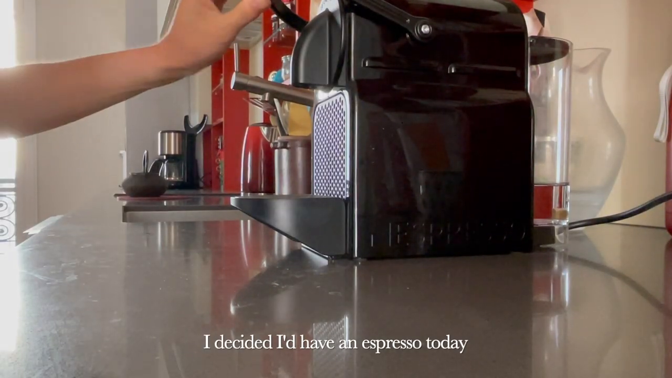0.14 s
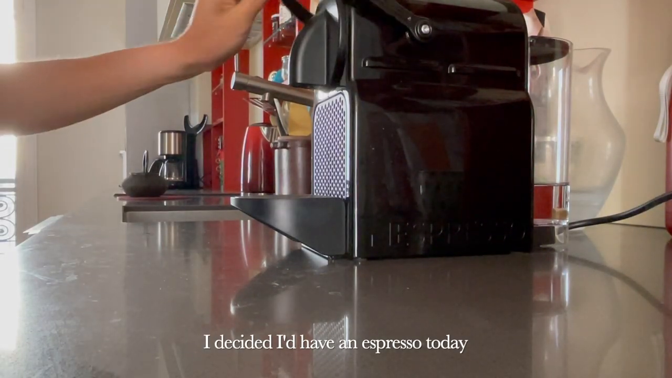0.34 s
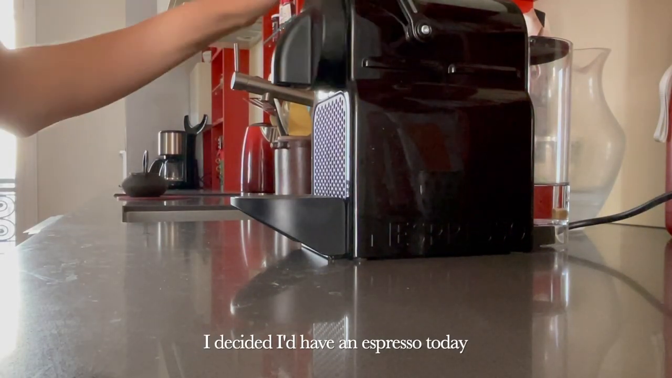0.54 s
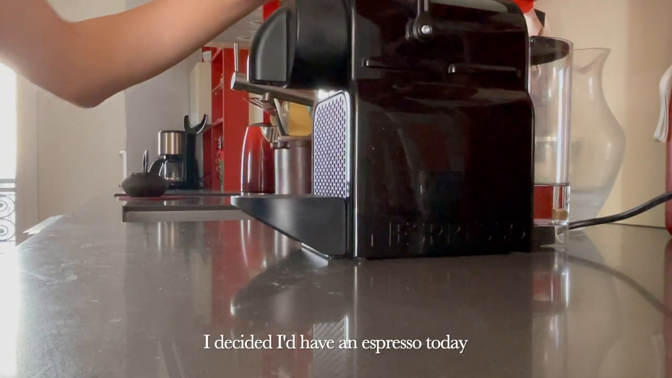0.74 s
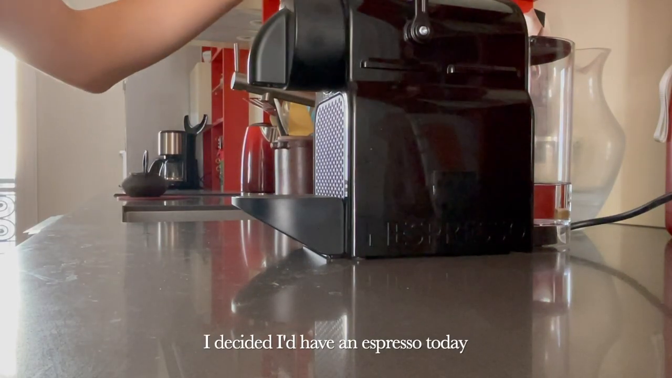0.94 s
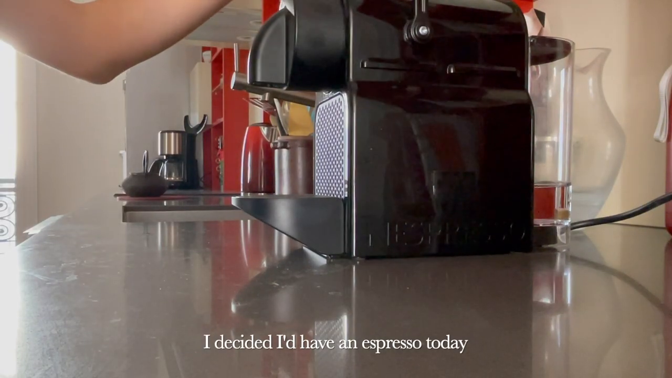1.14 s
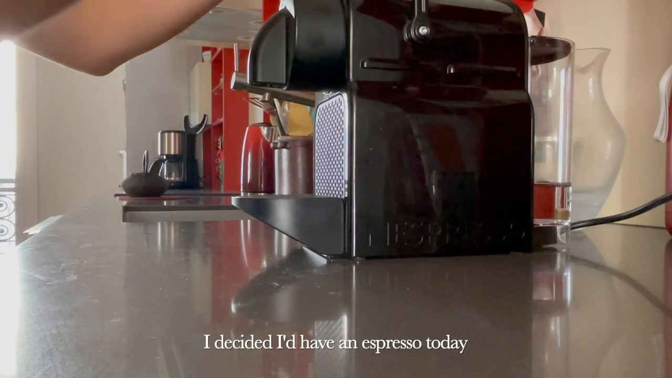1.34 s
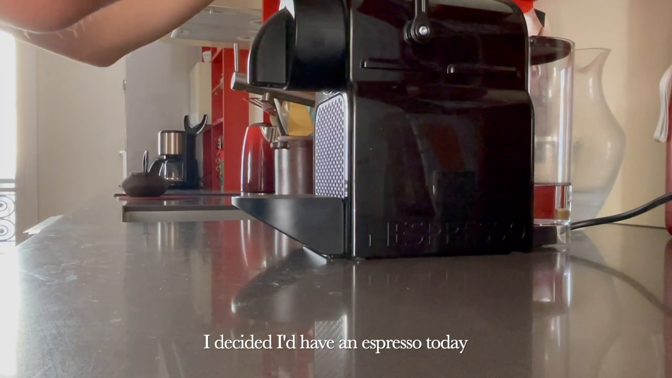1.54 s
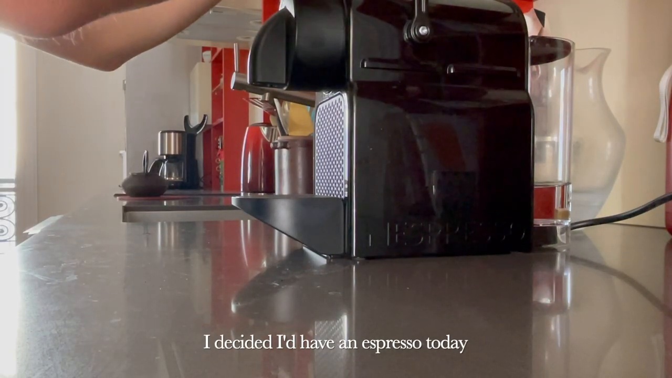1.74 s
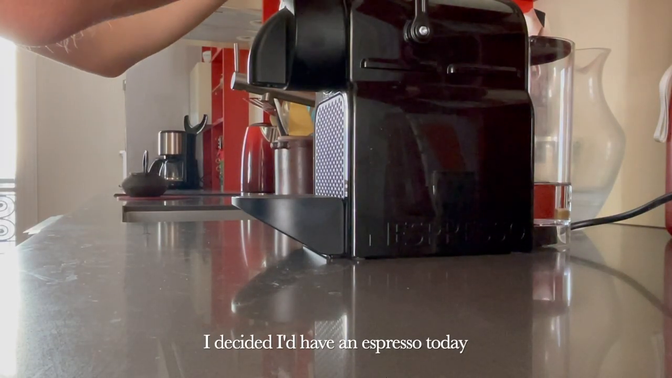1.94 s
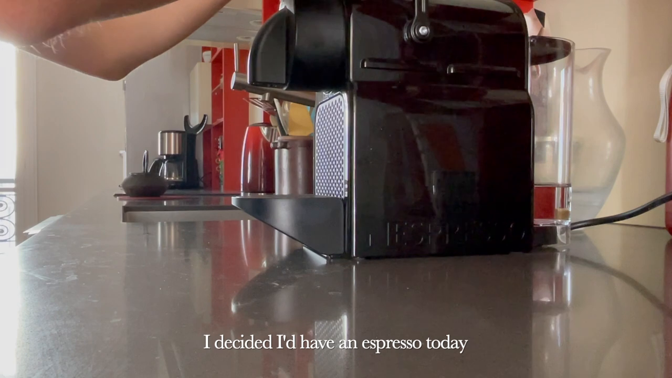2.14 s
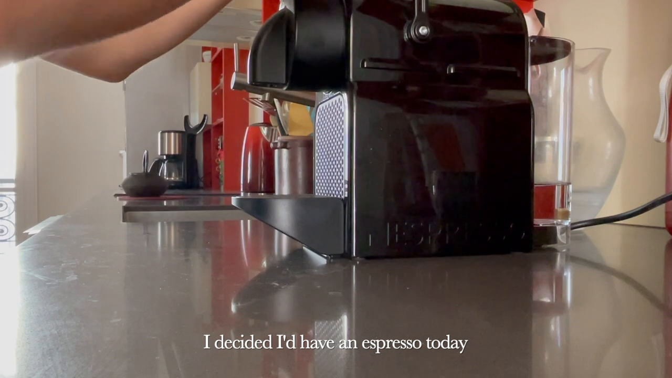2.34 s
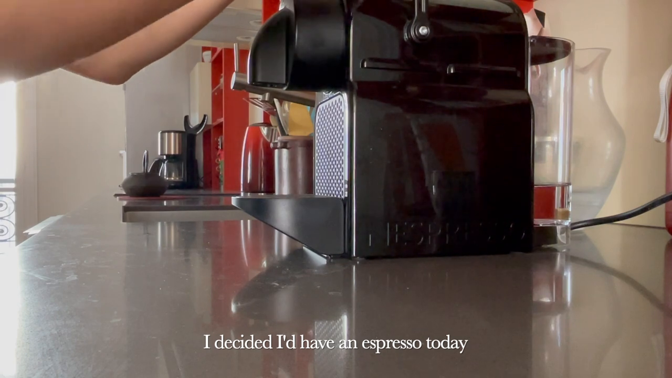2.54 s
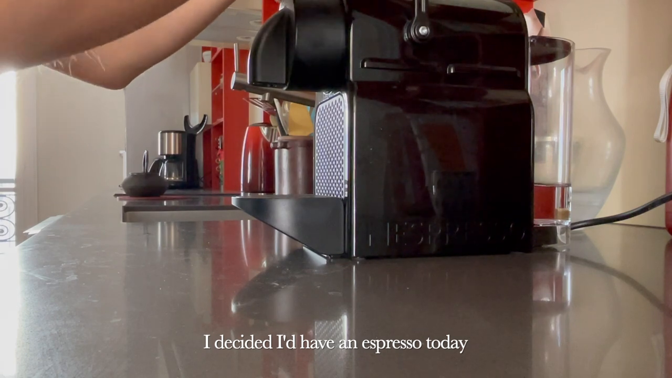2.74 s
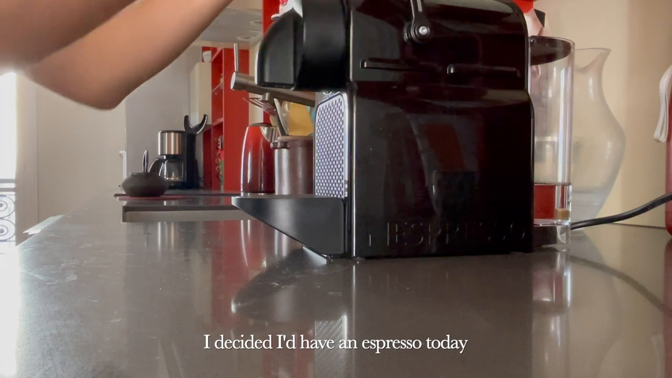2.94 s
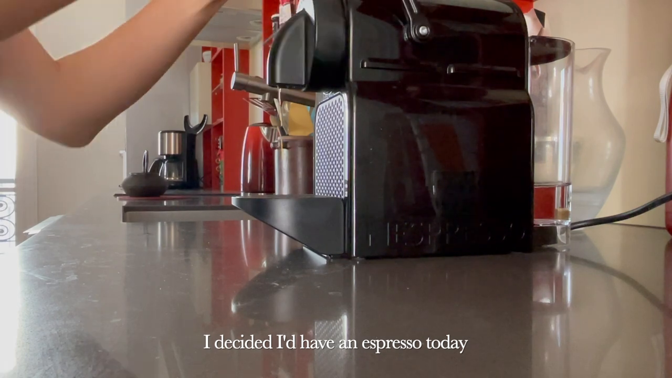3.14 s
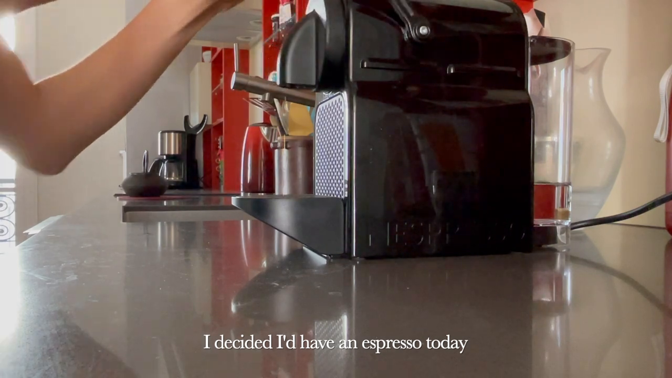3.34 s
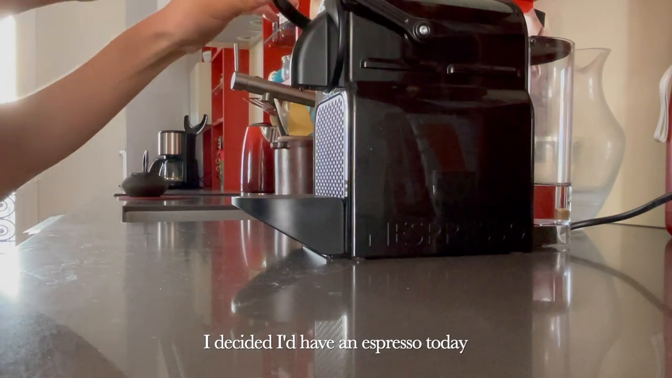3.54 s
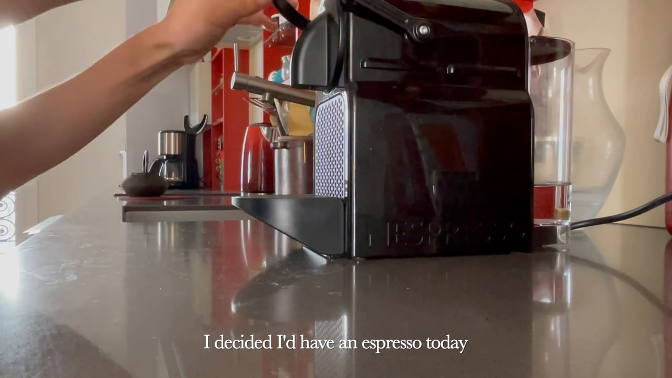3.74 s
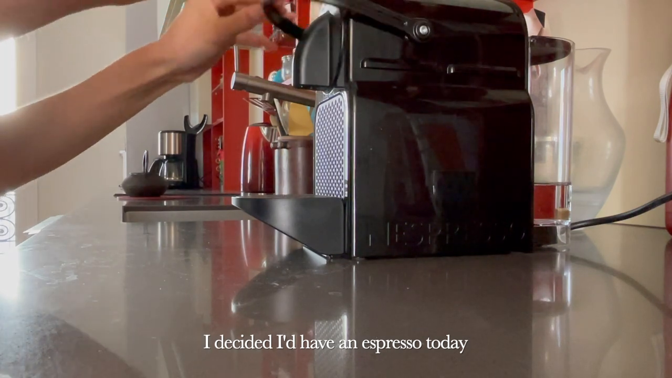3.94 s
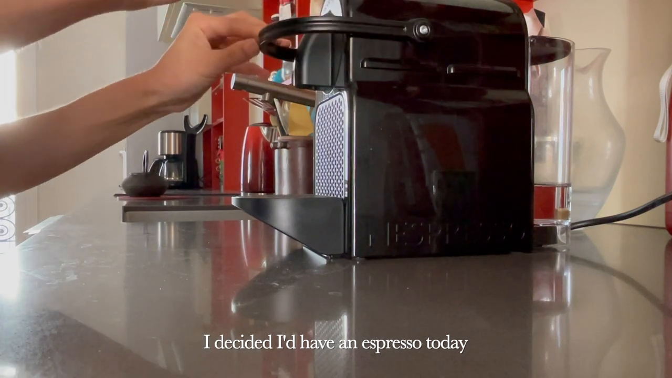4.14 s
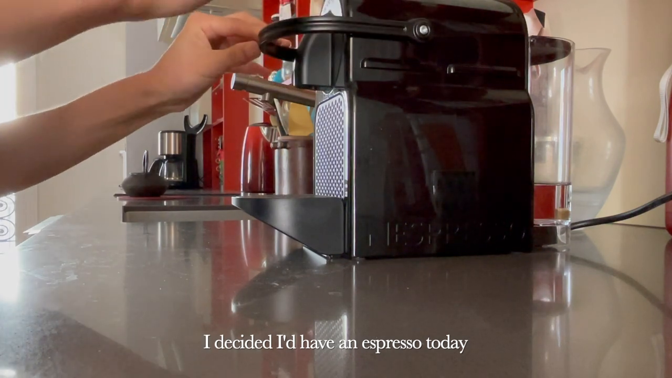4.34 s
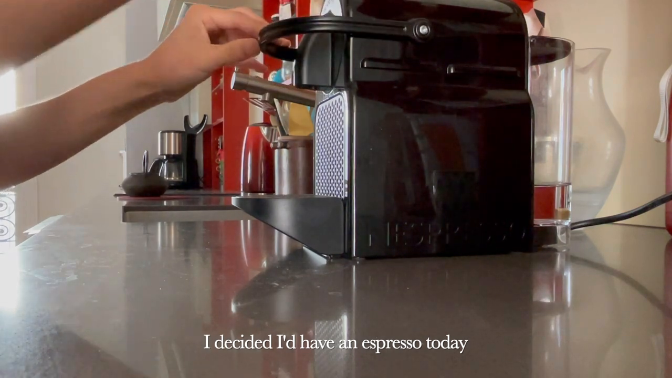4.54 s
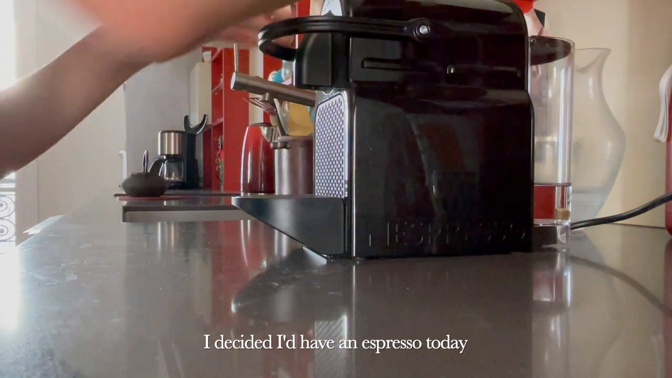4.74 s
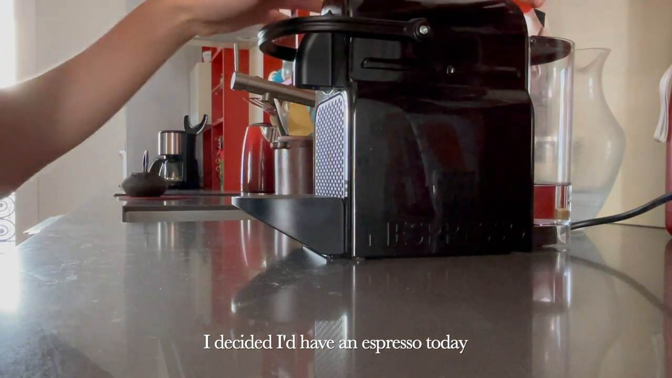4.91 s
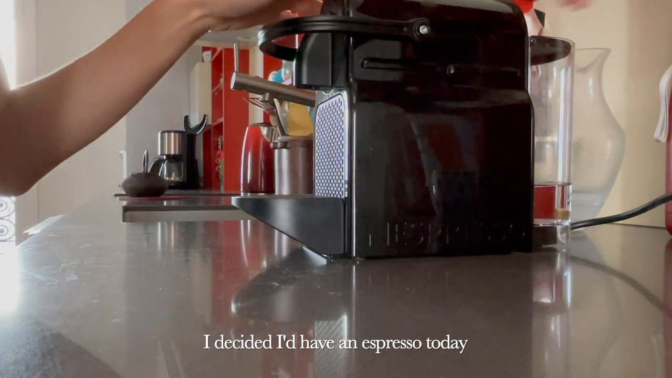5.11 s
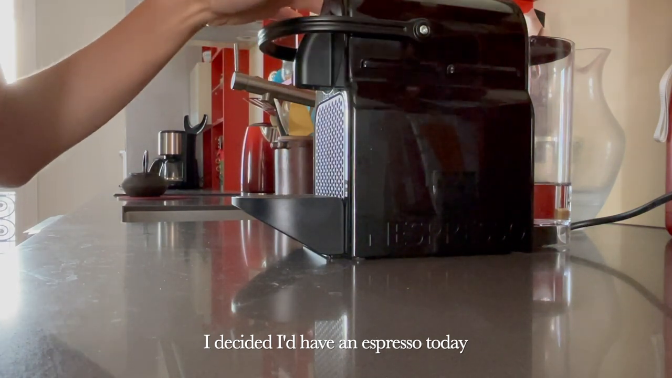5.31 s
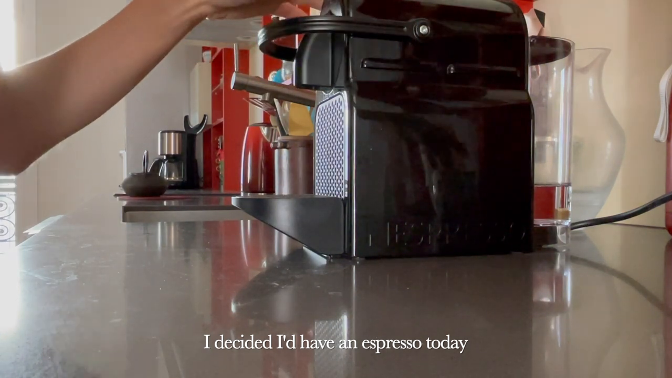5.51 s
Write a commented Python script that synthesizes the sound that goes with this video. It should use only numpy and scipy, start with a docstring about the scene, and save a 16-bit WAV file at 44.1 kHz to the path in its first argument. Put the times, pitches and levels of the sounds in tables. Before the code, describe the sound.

Hard plastic clicks, short scrapes and a heavy locking thud from a capsule coffee machine worked by hand in a quiet kitchen.

```python
"""A lever slides open and clunks, a capsule rattles in, the lever comes down and locks with a deep thud,
then a hand brushes the top and gives one last click: a capsule coffee machine on a stone kitchen counter.
Each contact mixes short noise bursts, a ringing plastic housing and a low thump that sets the counter humming.
Sliding is coloured noise with tiny slips in it, and the pivot's squeak is an uneven gliding tone.
Noise tails make the brief echo of the hard kitchen, over quiet room air and distant rumble."""
import sys
import numpy as np
from scipy import signal
from scipy.fft import rfft, irfft, next_fast_len
from scipy.io import wavfile
from scipy.ndimage import uniform_filter1d, map_coordinates

SR = 44100
rng = np.random.default_rng(int(sys.argv[2]) if len(sys.argv) > 2 else 0)


def digitize_waveform(pressure):
    """Quantize a signal to 16-bit integers and store it at the path in sys.argv[1].

    Rows of a 2-D input are taken as channels; values are limited to [-1, 1].
    """
    field = np.atleast_2d(pressure).T
    bounded = np.clip(field, -1, 1)
    quanta = np.round(bounded * 32767).astype(np.int16)
    wavfile.write(sys.argv[1], SR, quanta)


N = 245637
TIME = np.arange(N) / SR  # seconds, whole scene
RING = np.arange(SR // 2) / SR  # seconds, one blow

# Resonances of the plastic housing: f/Hz, relative level/dB, time to fade by 60 dB/s
SHELL_MODES = [(305, -18, .08), (365, -10, .115), (420, -10, .09), (500, -5, .09), (562, -4, .08),
               (675, -5, .08), (745, -5, .11), (830, -7, .08), (915, -5, .08), (1010, -7, .09),
               (1148, -3, .11), (1405, -9, .09), (1490, -9, .1), (1692, -11, .1), (1790, -12, .1),
               (1900, -8, .09), (2086, -11, .09), (2245, -7, .1)]
# How different left and right are: f/Hz, level of the difference against the common part/dB
STEREO_WIDTH = [(60, -13.5), (130, -10.5), (260, -10), (500, -9), (1000, -5.5), (2000, -3.5), (5000, 10),
                (8000, -12.5), (14000, 19)]


def amp(db):
    """Decibels to gain."""
    return 10 ** (np.asarray(db) / 20)


def unit(x):
    """Scale to an rms (average strength) of 1."""
    return x / np.sqrt(np.mean(x ** 2) + 1e-20)


def along(points, hz):
    """Read a table of (f/Hz, value) at any frequency, on a log axis."""
    f, v = np.transpose(points)
    return np.interp(np.log(hz + 1), np.log(f), v)


def filtered(x, response):
    """Multiply the spectrum of x by a response that depends on frequency."""
    n = x.shape[-1]
    padded = next_fast_len(n + 8192)
    spectrum = rfft(x, padded) * response(np.fft.rfftfreq(padded, 1 / SR))
    return irfft(spectrum, padded)[..., :n]


def resonance(f, hz, width):
    """Response of one resonance: 1 at its pitch hz, falling away on both sides; width in Hz."""
    return 1j * f * width / (hz * hz - f * f + 1j * f * width)


def width_from_fade(t60):
    """A resonance that fades slowly is narrow: its width in Hz from its 60 dB fade in seconds."""
    return np.log(1000) / (np.pi * t60)


def spread(pair):
    """Turn two unrelated signals into left and right, as different at each frequency as the width table says."""
    def shares(hz):
        side = amp(along(STEREO_WIDTH, hz))
        return np.array([np.ones_like(side), side]) / np.hypot(1, side)
    mid, side = filtered(pair, shares)
    return np.array([mid + side, mid - side])


def coloured(pair, spectrum):
    """A stereo sound of rms 1 with the given spectrum."""
    return unit(spread(filtered(pair, lambda hz: amp(along(spectrum, hz)))))


def wobble(rate):
    """A smooth random curve with `rate` random points a second."""
    points = rng.standard_normal(int(N * rate / SR) + 4)
    return map_coordinates(points, [TIME * rate])


def struck(attack, t60):
    """The loudness curve of a blow: a quick rise, then an even fade (both in seconds)."""
    return (1 - np.exp(-RING / attack)) * amp(-60 * RING / t60)


def add(track, s, sound):
    """Mix a sound into the track at s seconds."""
    part = track[..., max(round(s * SR), 0):][..., :sound.shape[-1]]
    part += sound[..., :part.shape[-1]]


def contacts():
    """A contact snaps, clacks, rings the housing and thumps the body, which shakes the counter."""
    # Spectra of the dull clack and the bright snap: f/Hz, level per Hz/dB
    clack_colour = [(120, -17.5), (300, 10.5), (800, 4), (1200, 0.5), (1700, -5), (2200, -5), (2600, -8.5),
                    (4000, -14.5), (6500, -25), (9000, -35.5), (16000, -41.5)]
    snap_colour = [(1000, -21.5), (3000, -11), (6000, 3.5), (8500, -3.5), (11000, -2.5), (13500, -10.5),
                   (16000, -9.5)]
    plastic, clacks, thumps = np.zeros((2, N)), np.zeros((2, N)), np.zeros(N)
    for s, thump_hz, thump_db, knock_hz, knock_db, clack_db, snap_db in blows():
        snap = coloured(rng.standard_normal((2, len(RING))), snap_colour) * struck(.0004, .04)
        clack = coloured(rng.standard_normal((2, len(RING))), clack_colour) * struck(.0007, .064)
        knock = shell_ring(knock_hz, reach=0.062, scatter_db=4.5, detune=0.0073)
        thump = struck(0.0017, 0.067) * np.sin(2 * np.pi * thump_hz * RING)
        add(plastic, s, amp(snap_db - 3) * snap)
        add(clacks, s, amp(clack_db - 3) * clack)
        add(plastic, s + .001, amp(knock_db - 2.5) * knock)
        # The heavy body answers later than the thin plastic.
        add(thumps, s + 0.0023, amp(thump_db + 6.5) * thump)
    return plastic + housing(clacks, panel_db=-1, shell_db=-0.5) + thumps + counter(thumps)


def blows():
    """Share out each contact's strength: (s, thump Hz, thump dB, knock Hz, knock dB, clack dB, snap dB).

    These levels are relative; contacts() trims each kind of sound once more."""
    # Hard plastic edges click together: t/s, strength/dB, snap over the strength/dB, knock f/Hz
    clicks = [ (0.7139, -23.5, -12.5, 1405), (0.767, -30.5, -13.5, 748.5), (.822, -22, -16, 371),
              (.834, -23, -28.5, 1390), (.858, -28.5, -24.5, 420), (1.211, -74, 11.5, 750),
              (1.2594, -88, 30, 750), (1.639, -39, -45, 493), (1.680, -34, -31, 503),
              (1.801, -34.5, -15, 550), (1.838, -41, -21, 1080), (1.960, -52, 1.5, 1495),
              (1.9935, -36, -8, 1010), (2.026, -39, 0, 1156), (2.038, -30, -10, 1148),
              (2.653, -48, -42, 565), (3.074, -68, 4, 750), (3.1718, -63.5, 4, 670),
              (3.362, -33.5, -15.5, 733), (3.4102, -30.5, -6, 765), (3.773, -59, -12, 2250),
              (4.016, -30.5, -20, 1130), (4.027, -20.5, -16.5, 2090), (4.033, -20.5, -33.5, 675),
              (4.542, -58.5, -15, 720), (4.9485, -33, -18.5, 1060)]
    # Blunt knocks that mostly ring the housing: t/s, strength/dB, knock f/Hz
    knocks = [(.150, -33.5, 524), (.199, -43, 830), (0.359, -49.5, 407), (.844, -26, 683),
              (1.732, -43.5, 970), (1.876, -38.5, 1493), (2.041, -33.5, 985), (2.642, -41.5, 950),
              (2.925, -38, 1040), (3.762, -47.5, 666), (4.837, -36.5, 438)]
    # The mechanism seats and the whole machine takes the load:
    # t/s, strength/dB, thump f/Hz, knock f/Hz, knock over the strength/dB, rocking over the strength/dB
    thuds = [(0.162, -41.5, 135, 498, -9.5, -18.5), (0.7171, -18.5, 192, 363, 9, -28),
             (.823, -18, 150, 365, -6, 1.5), (1.641, -42, 160, 426, -2, -4.5),
             (2.052, -34.5, 175, 420, -11, -5), (2.651, -44, 172.6, 550, 1, 0),
             (2.816, -41, 192, 562, -12, -10.5), (3.298, -33, 179, 425, -16, -23),
             (3.411, -28, 140.1, 790, -12, -24.5), (3.43, -25, 200, 414, -2.5, -18.5),
             (3.436, -21.5, 68.6, 374.6, -21.5, -10), (4.0329, -9, 88.7, 745, -11, -10),
             (4.038, -19, 180.2, 365, -2.5, -20.5)]
    body_hz = 200  # the body's own note under a click or a knock
    rock_hz, rock_delay_s = 65.4, .016  # the machine rocks back on its rubber feet
    for s, db, snap_db, knock_hz in clicks:
        yield s, body_hz, db - 14.5, knock_hz, db - 7.5, db, db + snap_db
    for s, db, knock_hz in knocks:
        yield s, body_hz, db - 21, knock_hz, db, db - 14.5, db - 36
    for s, db, thump_hz, knock_hz, knock_db, rocking_db in thuds:
        yield s, thump_hz, db, knock_hz, db + knock_db, db - 14.5, db - 39
        rock_db = db + rocking_db
        yield s + rock_delay_s, rock_hz, rock_db, knock_hz, rock_db - 20, rock_db - 30.5, rock_db - 49


def shell_ring(knock_hz, reach, scatter_db, detune):
    """The struck spot favours the housing's resonances around one pitch; reach is in octaves."""
    ring = 0
    for hz, db, t60 in SHELL_MODES:
        level, shift, skew = rng.standard_normal(3)
        favour = 1 / np.hypot(1, np.log2(hz / knock_hz) / reach)
        # Left and right get opposite shifts of phase.
        apart = np.array([[1], [-1]]) * skew * amp(along(STEREO_WIDTH, hz))
        phase = 2 * np.pi * (hz * (1 + detune * shift) * RING + rng.random()) + apart
        gain = favour * amp(db + scatter_db * level)
        ring = ring + gain * struck(0.00025, t60) * np.sin(phase)
    return ring / np.abs(ring).max()


def housing(x, panel_db, shell_db):
    """Whatever scrapes or clacks is coloured by the housing's resonances."""
    # Thin panels: f/Hz, width/Hz, relative level/dB
    thin_panels = [(3105, 46, -3.5), (3560, 49, -7), (3790, 74, -2.5), (5600, 19, -9.5), (6840, 200, -6.5),
                   (6750, 690, -4)]

    def response(f):
        total = 1
        for hz, width, db in thin_panels:
            total = total + amp(panel_db + db) * resonance(f, hz, width)
        for hz, db, t60 in SHELL_MODES:
            total = total + amp(shell_db + db) * resonance(f, hz, width_from_fade(t60))
        return total
    return filtered(x, response)


def counter(thumps):
    """The worktop and its cupboard go on humming after a thump."""
    # Lingering low resonances: f/Hz, relative level/dB, time to fade by 60 dB/s
    low_modes = [(62.6, -25, 1), (74, -25.5, 0.3), (97.4, -18, 0.5), (135.3, -21, 0.4), (174.4, -23, 0.8)]

    def response(f):
        total = 0
        for hz, db, t60 in low_modes:
            total = total + amp(db + 19) * resonance(f, hz, width_from_fade(t60))
        return total
    return filtered(thumps, response)


def sliding():
    """Lever, carriage, capsule and hand rub along the plastic, from low drag to bright hiss."""
    # Spectra of sliding, from dull to bright: f/Hz, level per Hz/dB
    drag_colour = [(40, -8.5), (80, -4.5), (130, -1.5), (200, -2), (290, -11.5), (450, -10.5), (900, -54)]
    rub_colour = [(190, -27.5), (330, 0), (450, -3), (620, 2), (850, -2), (1100, -0.5), (1400, -4),
                  (1800, -6.5), (2400, -10.5), (3500, -31.5), (6000, -49)]
    scrape_colour = [(1300, -11.5), (2200, 0.5), (2700, 4.5), (3300, 1.5), (4300, -1.5), (5200, -15.5),
                     (8000, -29.5)]
    rasp_colour = [(3000, -23.5), (4600, 2), (5500, -3.5), (7000, -1.5), (8000, -12), (10000, -25)]
    hiss_colour = [(4000, -23), (7500, -12.5), (10000, 6), (12000, -1.5), (13500, -10.5), (16000, -16.5)]
    drag, rub, scrape, hiss = stroke_layers()
    rasp = np.sqrt(scrape * hiss)  # middling roughness follows both the coarse and the fine
    rubbing = amp(-4) * rub * friction(rub_colour, grain_rate=390, grain_share=0.16, flutter_db=0.97)
    scraping = amp(-3) * scrape * friction(scrape_colour, grain_rate=1500, grain_share=0.43, flutter_db=1.2)
    rasping = rasp * friction(rasp_colour, grain_rate=680, grain_share=0.11, flutter_db=3.7)
    dragging = drag * friction(drag_colour, grain_rate=240, grain_share=0.38, flutter_db=2)
    hissing = amp(2) * hiss * friction(hiss_colour, grain_rate=870, grain_share=0.23, flutter_db=0.55)
    plastic = wandering(rubbing + scraping + rasping, depth_db=2.5)
    return housing(plastic, panel_db=-5, shell_db=2) + dragging + hissing


def stroke_layers():
    """Gains of drag, rub, scrape and hiss over time; each grows with speed at its own rate, hiss the most."""
    # Sliding strokes, in order: the lever rises, the carriage drags back, the capsule slides in,
    # the lever comes down, the hand moves on top. Levels are relative. Columns:
    # start t/s, length/s, time to full speed/s, swell/dB, level/dB, then drag, scrape, hiss over it/dB
    sliding_strokes = [(-.18, 0.45, 0.18, 26, -51.5, 1.5, -1, -18.5),
                       (.235, 0.53, 0.24, 18, -52.5, 2.5, -1, -17.5),
                       (.35, 0.075, 0.036, 38, -63, 13, -22, -27),
                       (1.74, 0.11, 0.045, 6.2, -49.5, -12, -21, -26.5),
                       (1.873, 0.023, 0.012, 6.2, -56.5, 3.5, -3, -11.5),
                       (1.934, 0.083, 0.0607, 8, -51.5, -7.5, -14.5, -22),
                       (2.831, 0.33, 0.14, 16, -54, 1, -10.5, -25.5),
                       (3.156, 0.071, 0.048, 6.6, -55, 0, -22.5, -34.5),
                       (3.257, 0.14, 0.11, 21, -44.5, -2.5, -9, -15),
                       (3.84, 0.27, .125, 26, -46.5, -4, -8.5, -28),
                       (4.559, 0.036, 0.026, 1.4, -71.5, 5, -5, -23),
                       (4.623, .185, 0.22, 7.9, -62, 5, -4, -15),
                       (4.834, 0.107, 0.037, 5.6, -55, -0.5, -7, -18.5)]
    # dB that drag, rub, scrape and hiss gain for each dB of speed
    grows = np.array([[.45], [0.17], [0.41], [1]])
    total = 0
    for start, length, to_full, swell_db, db, drag_db, scrape_db, hiss_db in sliding_strokes:
        gate, speed_db = stroke(start, length, to_full, swell_db)
        layer_db = db + np.array([[drag_db], [0], [scrape_db], [hiss_db]])
        total = total + gate * amp(layer_db + grows * speed_db)
    return total


def stroke(start, length, to_full, swell_db):
    """A stroke grips, gathers speed and slackens: its gate, and its speed in dB below the fastest moment."""
    grip_s, run_out_s = .04, 0.043  # it sets in before the start and dies away after the end
    corners = [start - grip_s, start, start + length, start + length + run_out_s]
    gate = np.interp(TIME, corners, [0, 1, 1, 0])
    return gate ** 2, -abs(swell_db) * ((TIME - start) / to_full - 1) ** 2


def friction(spectrum, grain_rate, grain_share, flutter_db):
    """Tiny slips of uneven size (grain_rate a second) over a smooth rub; the pressure flutters."""
    slips = (rng.random(N) < grain_rate / SR) * rng.standard_normal((2, N))
    smooth = rng.standard_normal((2, N))
    force = np.sqrt(grain_share) * unit(slips) + np.sqrt(1 - grain_share) * smooth
    return unit(coloured(force, spectrum) * amp(flutter_db * wobble(rate=49)))


def wandering(x, depth_db):
    """As the rubbing spot moves, parts of the spectrum come and go."""
    z = signal.stft(x, nperseg=1024)[2]
    # Random levels, smoothed over neighbouring frequencies and then over time
    field = uniform_filter1d(rng.standard_normal(z.shape[1:]), size=4, axis=0)
    field = uniform_filter1d(field, size=5, axis=1)
    return signal.istft(z * amp(depth_db * unit(field)), nperseg=1024)[1][:, :N]


def squeak():
    """The rough pivot sticks and slips unevenly, faster as the lever rises: a wobbling tone that climbs."""
    # Path of the squeak: t/s, f/Hz, level/dB
    squeak_path = [(0.189, 753, -78), (0.204, 791, -47), (.24, 887, -57.5), (.28, 1090, -50.5),
                   (.33, 1176, -57.5), (0.448, 1296, -60), (.55, 1304, -80.5)]
    s, hz, db = np.transpose(squeak_path)
    phase = 2 * np.pi * np.cumsum(np.interp(TIME, s, hz)) / SR
    tone = unit(wobble(rate=380) * np.sin(phase) + wobble(rate=380) * np.cos(phase))
    return tone * amp(np.interp(TIME, s, db, left=-150, right=-150))


def fingers():
    """Fingertips brush lightly: grainy noise that swells with their speed."""
    # Light brushing: start t/s, length/s, time to full speed/s, swell/dB, level/dB
    brushes = [(0.993, .024, 0.019, 17, -63.5), (1.049, 0.45, 0.13, 4, -73.5), (5.225, 0.33, 0.062, 0, -87)]
    # Spectrum of brushing: f/Hz, level per Hz/dB
    brush_colour = [(1200, -7), (3000, 0), (5000, -3), (6500, 4), (8500, -7), (11500, 0.5), (14000, -9),
                    (16000, -14)]
    touch = 0
    for start, length, to_full, swell_db, db in brushes:
        gate, speed_db = stroke(start, length, to_full, swell_db)
        touch = touch + gate * amp(db + speed_db)
    return touch * friction(brush_colour, grain_rate=330, grain_share=0.28, flutter_db=0)


def kitchen(x, delay=.006, build=0.0027):
    """Hard walls answer with a fading noise tail, a fresh one for each third of a second (times in s)."""
    # How long the echo lasts: f/Hz, time to fade by 60 dB/s
    fade_times = [(80, 0.74), (250, 0.21), (700, 0.64), (2000, 0.55), (5000, 0.53), (8000, 0.28),
                  (14000, .2)]
    # How loud the echo is: f/Hz, level/dB
    echo_levels = [(50, -19.5), (150, -9.5), (400, -6.5), (1000, -13), (3000, -11), (7000, -7.5),
                   (14000, -15.5)]
    wet = np.zeros((2, N))
    size = SR // 3
    for start in range(0, N, size):
        hz, t, z = signal.stft(rng.standard_normal((2, SR)), SR, nperseg=256)
        decay = amp(-60 * t / along(fade_times, hz)[:, None]) * (1 - np.exp(-t / build))
        # Give every frequency its level, however long it lasts.
        decay *= amp(along(echo_levels, hz))[:, None] / np.sqrt(SR * np.mean(decay ** 2, axis=1, keepdims=True))
        tail = spread(signal.istft(z * decay, SR, nperseg=256)[1])
        echo = signal.fftconvolve(x[:, start:start + size], tail, axes=1)
        add(wet, start / SR + delay, echo)
    return wet


def room_air():
    """Room air and distant rumble: steady noise, strongest in the bass."""
    # Spectrum of the background: f/Hz, level per Hz/dB
    air_colour = [(22, 10.5), (35, 12.5), (59, 4.5), (110, -4), (160, -12.5), (200, -9.5), (320, -20.5),
                  (430, -20.5), (1000, -31), (2000, -32), (6000, -38.5), (11000, -41), (15500, -46.5)]
    return amp(-61.5) * coloured(rng.standard_normal((2, N)), air_colour)


def scene():
    """The machine, its echo and the quiet room."""
    machine = contacts() + sliding() + squeak() + fingers()
    balance = amp([[.3], [-.3]])  # slightly louder on the left
    return (machine + kitchen(machine)) * balance + room_air()


def record(dry, low_cut_hz=50):
    """Sound reaches the right just before the left; the recorder drops deep rumble and the highest treble."""
    lag_s, top_hz = 2.7 / SR, 15900
    low_cut = signal.butter(4, low_cut_hz, "high", fs=SR, output="sos")
    heard = signal.sosfilt(low_cut, dry)

    def response(hz):
        # Half the lag delays the left, the other half advances the right.
        shift = np.exp(1j * np.pi * hz * lag_s * np.array([[-1], [1]]))
        return shift * (hz < top_hz)
    return filtered(heard, response)


dry = scene()
out = record(dry)
digitize_waveform(out)
```